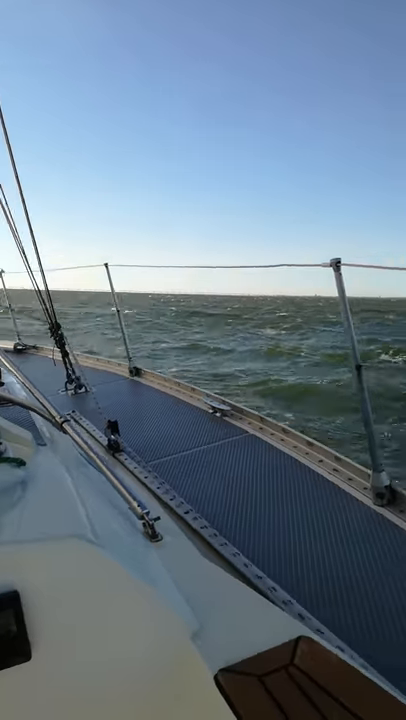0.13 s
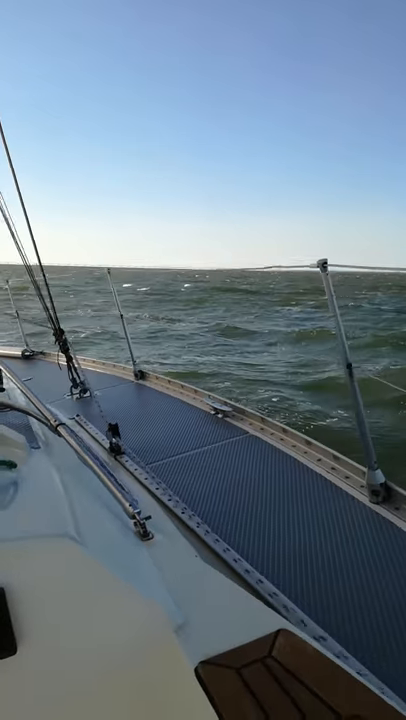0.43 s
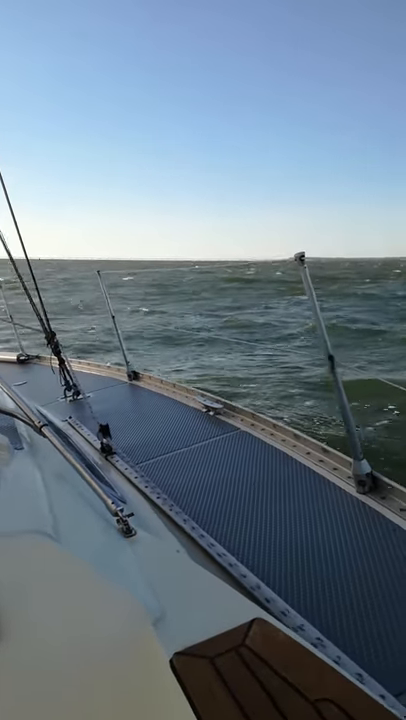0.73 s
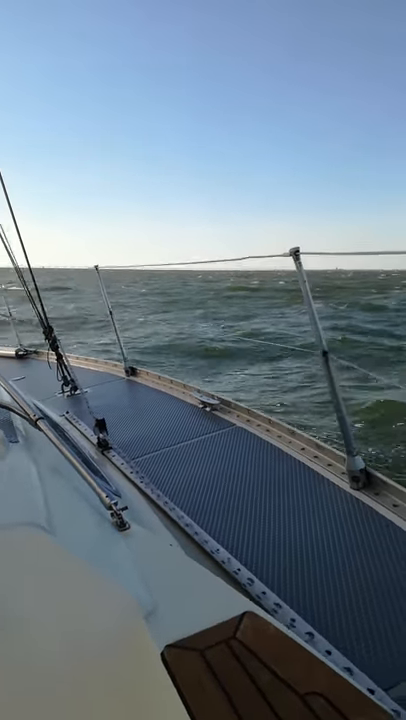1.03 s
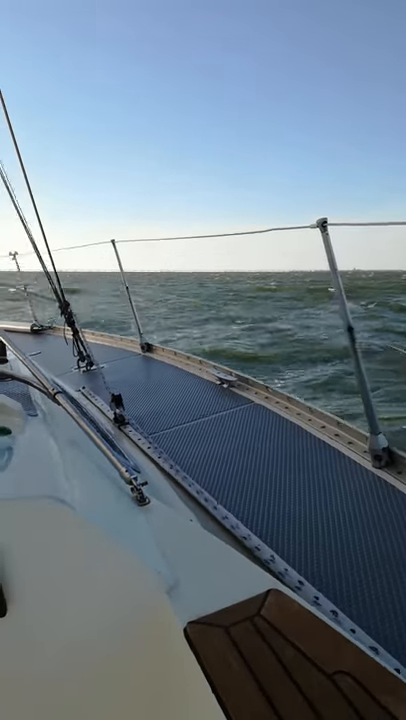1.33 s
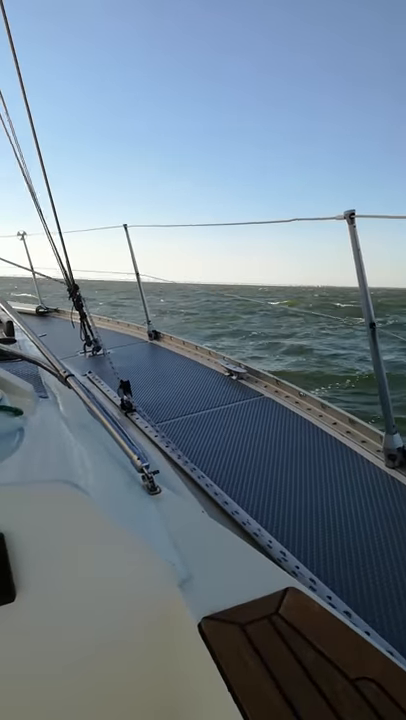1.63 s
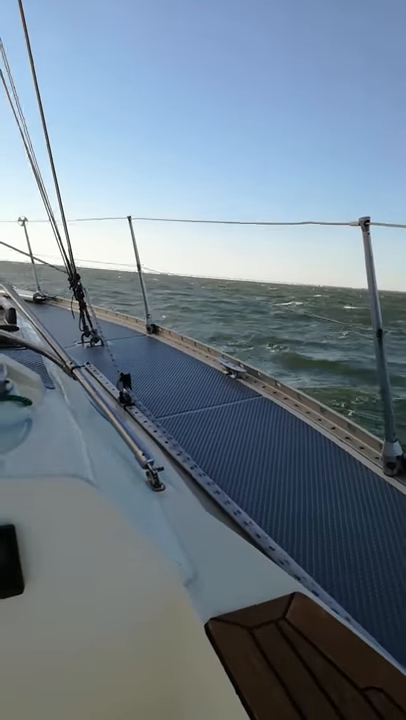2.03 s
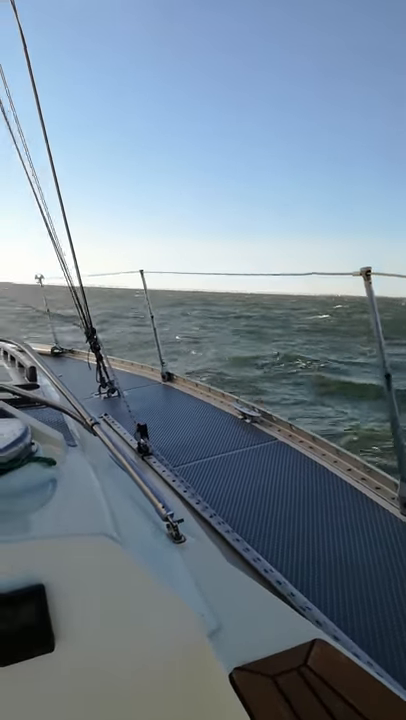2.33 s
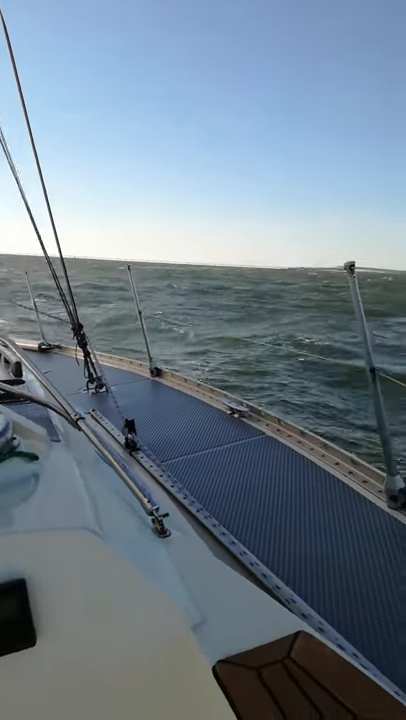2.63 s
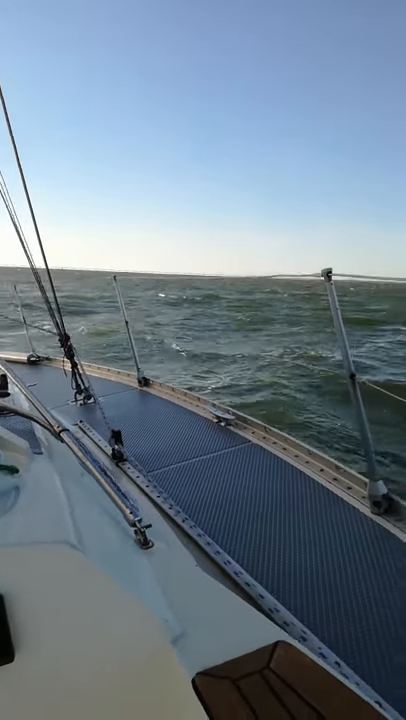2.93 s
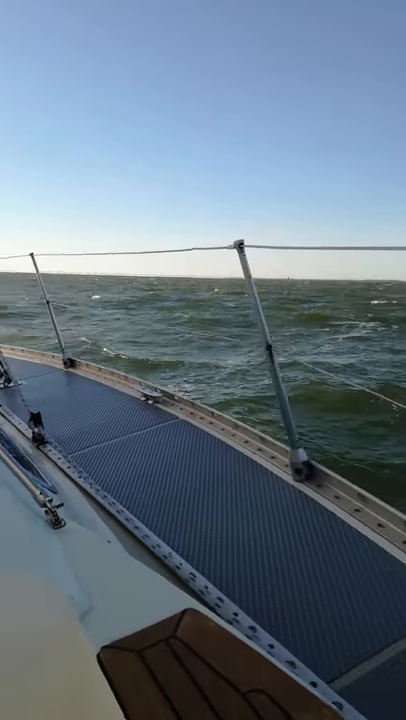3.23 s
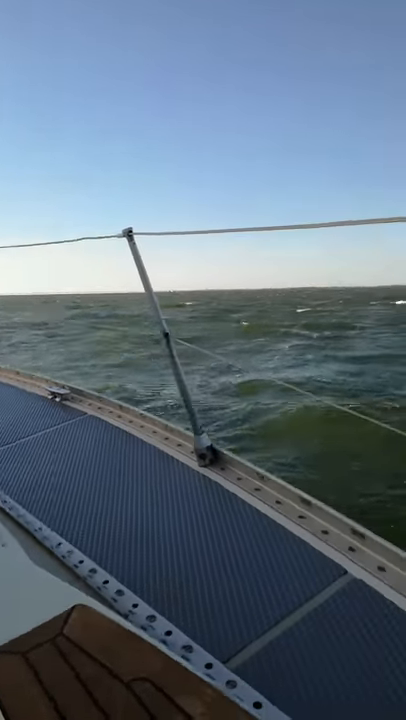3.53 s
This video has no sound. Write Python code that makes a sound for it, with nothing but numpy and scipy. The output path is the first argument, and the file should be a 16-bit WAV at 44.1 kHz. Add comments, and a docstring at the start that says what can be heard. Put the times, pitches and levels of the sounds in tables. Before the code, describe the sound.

Gusty wind rumbles and thumps on a microphone aboard a sailing boat, water rushing faintly along hull

```python
"""Gusty wind rumbles, flutters and thumps on two microphone ports, on the deck of a boat in a choppy sea.
The wind is shaped noise broken into lumps by eddies, with short pressure pulses and sliding low booms.
Water rushes along the hull as noise with ringing drops; a wave breaks into spray near the end.
Wavelets splash as swells of hiss, and fittings in the rigging tick and knock as cracks with decaying tones."""
import sys
import numpy as np
from scipy import signal
from scipy.fft import rfft, irfft, next_fast_len
from scipy.io import wavfile
from scipy.ndimage import uniform_filter1d

SR = 44100
rng = np.random.default_rng(int(sys.argv[2]) if len(sys.argv) > 2 else 0)


def bounce(signal):
    """Save signal as a 16-bit WAV file at the path given by the first command-line argument."""
    frames = np.transpose(np.atleast_2d(signal))
    limited = np.clip(frames, -1, 1)
    pcm = np.round(limited * 32767).astype(np.int16)
    wavfile.write(sys.argv[1], SR, pcm)


N = 162288
TIME = np.arange(N) / SR  # seconds

# Levels are in dB before any layer trim. Side means left minus right in dB, before any scaling or port leak.
# Spectra give the shape of a noise; its loudness is set elsewhere.

# Wind strength. Each row: time in seconds, rumble level in dB, flutter level in dB.
WIND_LEVELS = [(0.0, -38, -48), (0.06, -35, -52), (0.09, -33.5, -52), (0.14, -30, -38.5), (0.25, -31, -46),
               (0.32, -26.5, -40.5), (0.37, -33, -51.5), (0.41, -25, -37.5), (0.44, -26, -34.5),
               (0.49, -33, -42), (0.55, -22.5, -35), (0.62, -35, -55), (0.65, -29.5, -44.5),
               (0.74, -25, -38), (0.87, -27.5, -40), (1.2, -27, -39.5), (1.33, -26, -31),
               (1.35, -26.5, -43), (1.47, -24, -34.5), (1.49, -34.5, -39.5), (1.63, -27.5, -37),
               (1.81, -30, -45), (1.9, -24.5, -34), (1.98, -31.5, -50), (2.09, -25.5, -38),
               (2.19, -26, -37), (2.26, -34, -42.5), (2.35, -20, -37.5), (2.37, -24.5, -31),
               (2.47, -26.5, -42), (2.52, -16.5, -25.5), (2.54, -29, -32), (2.63, -28.5, -45.5),
               (2.65, -25.5, -41), (2.8, -27, -36.5), (2.86, -28.5, -43), (2.89, -25, -37),
               (3.07, -26, -33), (3.11, -35.5, -45), (3.14, -23, -33.5), (3.32, -25.5, -34),
               (3.36, -22.5, -36.5), (3.53, -26.5, -36.5), (3.55, -24.5, -46.5), (3.61, -30, -36.5),
               (3.66, -23, -38)]
# Which port the rumble and flutter favour. Each row: time in seconds, side in dB.
WIND_SIDES = [(0.0, 5), (0.06, -2), (0.25, 7), (0.28, -7), (0.61, -2), (0.76, -4), (0.88, 23), (1.57, -5.5),
              (1.6, 23), (1.69, -9), (1.83, 4), (2.42, 0), (2.53, -21), (2.56, 9), (2.91, -3), (2.97, 2.5),
              (3.66, 2)]
# Slow surges of pressure. Each row: time in seconds, level of the deep sway in dB.
SURGE_LEVELS = [(0.0, -40.5), (0.57, -28.5), (0.61, -35.5), (0.75, -25), (0.79, -33.5), (1.29, -27.5),
                (1.32, -40), (1.45, -21), (1.47, -28), (2.34, -29.5), (2.41, -26), (2.45, -36),
                (2.51, -19.5), (2.61, -30), (2.91, -29), (3.05, -24.5), (3.2, -36), (3.24, -22),
                (3.47, -36.5), (3.53, -23), (3.57, -47), (3.66, -31.5)]
# Gusts tearing past the edge of the ports. Each row: time in seconds, whoosh level in dB, side in dB.
WHOOSH_LEVELS = [(0.0, -58, 10), (0.1, -56, -7), (0.35, -52, 3), (0.39, -60, 2), (0.43, -44.5, 0.5),
                 (0.68, -55, 1), (0.77, -47.5, -10), (0.88, -46.5, 6), (1.11, -50.5, -4.5),
                 (1.23, -42.5, -8), (1.295, -37, -6), (1.35, -46, 2), (1.54, -47.5, -22), (1.61, -48, -3),
                 (1.75, -40, -10), (1.83, -56, 1), (1.91, -48.5, 6), (2.0, -47, -5), (2.04, -41.5, -5),
                 (2.085, -34, -10), (2.13, -45, 0), (2.18, -39, -5), (2.24, -45.5, -8), (2.41, -45.5, -6),
                 (2.485, -39, -4), (2.52, -34.5, -13), (2.55, -41, 7), (2.59, -53, 4.5), (2.84, -44, -20),
                 (2.97, -47, 10), (3.24, -44.5, 2.5), (3.35, -45.5, -2), (3.66, -48.5, 7)]
# Spectra of the large slow eddies, the rumble, the flutter, the whoosh, and the hiss of the hardest gusts
# at the port edges. Each row: frequency in Hz, relative strength in dB per Hz.
SWAY_SPECTRUM = [(15, -7), (30, -8.5), (48, -4), (70, -0.5), (110, 2), (150, -3), (400, -47.5)]
RUMBLE_SPECTRUM = [(25, -33), (60, -19), (120, -3.5), (175, -1), (300, -3), (450, -9), (700, -16.5),
                   (1200, -36.5), (2500, -79.5)]
FLUTTER_SPECTRUM = [(200, -15.5), (450, -2.5), (700, -5), (1000, -10), (1500, -22.5), (2300, -28),
                    (4000, -42), (7000, -64)]
WHOOSH_SPECTRUM = [(500, -16), (900, 4), (1300, 1.5), (1700, -3), (2300, -14.5), (4000, -30), (5500, -32),
                   (9000, -63.5)]
EDGE_SPECTRUM = [(1800, 2.5), (4000, -3), (6500, -29)]
SWAY_DB, RUMBLE_DB, FLUTTER_DB, WHOOSH_DB = -0.5, 3, 7, 5.5  # layer trims
EDGE_DB, EDGE_GROWTH = 7.5, 1.58  # growth: dB of hiss per dB of whoosh

# Water along the hull. Each row: time in seconds, rush level in dB, spray level in dB.
WATER_LEVELS = [(0.0, -64.5, -78), (0.13, -64.5, -79), (0.46, -63, -75.5), (0.57, -58.5, -74),
                (0.82, -59.5, -71.5), (1.31, -56.5, -72.5), (1.83, -61.5, -75.5), (2.1, -63.5, -75),
                (2.3, -59.5, -77), (2.64, -61.5, -74), (2.78, -57, -68), (2.89, -50.5, -63),
                (3.01, -53.5, -65), (3.11, -54.5, -67.5), (3.21, -55, -65), (3.34, -58, -71.5),
                (3.52, -58.5, -71), (3.66, -59, -75)]
# Spectra of the rush and the spray. Each row: frequency in Hz, relative strength in dB per Hz.
RUSH_SPECTRUM = [(400, -1.5), (1200, 4.5), (2300, -4), (3500, 2.5), (4400, -3), (5300, -2.5), (7000, -11.5),
                 (9000, -23), (15000, -35.5)]
SPRAY_SPECTRUM = [(3000, -10), (6000, 3), (8500, 0.5), (11500, -3.5), (15500, -5)]
RUSH_DB, RUSH_SIDE_DB, SPRAY_DB, SPRAY_SIDE_DB = 3.5, -3.5, 5.5, 6
DROPS_PER_S, DROP_SPREAD_DB = 1300, 5  # per channel
DROP_CYCLES, DROPS_DB = 4.5, -9.5  # cycles to fall 60 dB; level beside the rush

# Single eddies that slap a port. Each row: time in seconds, level in dB before the low cut,
# width in seconds, side in dB.
BUFFET_HITS = [(0.066, -15, 0.00047, -15), (0.2812, -12.5, 0.00078, 0), (0.7443, -12, 0.00065, -18),
               (.765, -12, 0.00044, -23), (1.0015, -12, 0.00046, 15), (1.446, -11, 0.00033, 21),
               (2.9003, -10.5, 0.00041, -20), (2.928, -13, 0.00037, 9), (3.054, -12.5, 0.0015, 20),
               (3.1425, -10.5, 0.00067, -9), (3.174, -14, 0.00031, 11), (3.225, -13, 0.0004, -7),
               (3.261, -6, 0.00053, -8), (3.5267, -5, 0.00098, -1)]
WAKE_FADE_S, WAKE_DB, WAKE_TOP_HZ, BUFFET_LOW_HZ = 0.0064, -1, 846, 80

# Wavelets against the hull. Each row: time of the peak in seconds, length (spread) in seconds, level in dB.
SPLASH_SWELLS = [(0.183, 0.024, -57.5), (0.77, 0.076, -53), (1.205, 0.038, -53.5)]
# Spectrum of a splash. Each row: frequency in Hz, relative strength in dB per Hz.
SPLASH_SPECTRUM = [(1500, -6), (2600, 4), (3500, 5), (5500, 1), (7500, -7.5), (10000, -18), (15000, -18)]

# Vortices rolling past the ports. Each row: time of the peak in seconds, half length (spread) in seconds,
# pitch at the peak in Hz before wobble, glide in octaves per second, level in dB.
VORTEX_BOOMS = [(0.43, .028, 150, -4, -22), (1.056, .04, 110, -3, -26), (1.682, .025, 122, 2, -24.5),
                (2.194, .03, 155, -3, -22), (2.406, .025, 128, 7, -25.5), (3.158, 0.027, 172, 4, -27),
                (3.251, 0.023, 135, 2.5, -26.5), (3.632, .05, 186, 1.5, -25.5)]
VORTEX_DB, VORTEX_ROUGH_DB = 0.5, 0.5  # trim; spread of the wavering level
VORTEX_WOBBLE_OCTAVES, VORTEX_WOBBLE_HZ = 0.1309, 63

# A shackle ticks, and a block on the sheet knocks and bounces.
# Each row: time in seconds, level in dB, side in dB.
SHACKLE_TICKS = [(1.379, -35.5, 2), (2.2765, -39, 5), (2.3255, -38, 1.5), (2.375, -34, 1), (3.402, -49, 3)]
BLOCK_KNOCKS = [(1.7503, -35.5, 1), (1.758, -43.5, -2)]
# Tones of the two fittings. Each row: pitch in Hz, relative level in dB, time to fall 60 dB in seconds.
SHACKLE_TONES = [(3100, -6.5, .035), (4050, 1.5, 0.033), (5400, -14.5, .03), (6240, -11, 0.035),
                 (7300, -17, .025), (9070, -21, .03)]
BLOCK_TONES = [(1860, 4, .04), (2910, 9, 0.055), (3450, 4, .03), (3980, -4, .055), (4200, 5, 0.04),
               (4930, 2, 0.038), (7400, -13, 0.035), (9200, -13, .03), (10700, -12, .025)]
# Spectrum of the crack of contact. Each row: frequency in Hz, relative strength in dB per Hz.
CRACK_SPECTRUM = [(1200, 1), (2800, 6.5), (5000, 1.5), (7000, -7), (11000, -19.5), (13500, -22),
                  (15500, -26)]
CLACK_ATTACK_S, CLACK_T60_S, DECK_DB, DECK_T60_S = 0.0018, 0.048, -9, 0.26

# Each port also reaches the other channel, late and dull.
LEAK_SHARE, LEAK_HZ, LEAK_LAG_S = 0.78, 400, 0.00055
CUTOFF_HZ = 15800


def from_db(db):
    """Turn decibels into gain."""
    return 10 ** (np.asarray(db) / 20)


def rms_one(x):
    """Scale a signal to an rms strength of 1."""
    return x / np.sqrt(np.mean(x ** 2) + 1e-20)


def in_time(rows):
    """Join the points of each column with straight lines, one value per sample."""
    s, *columns = np.transpose(rows)
    return [np.interp(TIME, s, column) for column in columns]


def panned(side_db):
    """Left and right gains that differ by side_db but keep the total power."""
    gains = from_db(np.array([[.5], [-.5]]) * side_db)
    return gains / np.sqrt(np.mean(gains ** 2, axis=0))


def drift(rate_hz):
    """Random wandering of spread 1: noise smoothed by two equal low-pass stages at rate_hz."""
    step = 20  # samples between computed points
    r = np.exp(-2 * np.pi * rate_hz * step / SR)
    raw = rng.standard_normal(N // step + 4002)
    slow = signal.lfilter([1], [1, -2 * r, r * r], raw)[4000:]  # skip the start-up
    return np.interp(np.arange(N) / step, np.arange(len(slow)), rms_one(slow))


def coloured(x, spectrum):
    """Give a signal a spectrum that falls away beyond its ends; rms 1."""
    hz, db = np.transpose(spectrum)
    size = next_fast_len(N + SR // 2)
    f = np.arange(size // 2 + 1) * SR / size + .5
    gain = from_db(np.interp(np.log(f), np.log(hz), db))
    gain = gain * np.minimum(f / hz[0], 1) ** 2 * np.minimum(hz[-1] / f, 1) ** 2
    return rms_one(irfft(rfft(x, size) * gain, size)[..., :N])


def noise(spectrum):
    """Shaped noise, unrelated between left and right."""
    return coloured(rng.standard_normal((2, N)), spectrum)


def ring(drive, hz, t60):
    """A resonance that rings at one pitch when struck and falls 60 dB in t60 seconds."""
    r, w = from_db(-60 / (t60 * SR)), 2 * np.pi * hz / SR
    return signal.lfilter([0, np.sin(w)], [1, -2 * r * np.cos(w), r * r], drive + 1e-18)


def turbulence(spectrum, eddies, shared_db, own_db, own_rate, even_s):
    """Noise of even strength broken into lumps by shared eddies and by each port's own."""
    air = noise(spectrum)
    strength = uniform_filter1d(np.mean(air ** 2, axis=0), int(even_s * SR) + 1)
    air = air / np.sqrt(strength + 1e-9)
    own_eddies = np.array([drift(own_rate), drift(own_rate)])
    return rms_one(air * from_db(shared_db * eddies + own_db * own_eddies))


def wind():
    """Deep sway, rumble, flutter and the bright whoosh of gusts, shaken by the same eddies."""
    rumble_db, flutter_db = in_time(WIND_LEVELS)
    sway_db, = in_time(SURGE_LEVELS)
    side_db, = in_time(WIND_SIDES)
    whoosh_db, whoosh_side_db = in_time(WHOOSH_LEVELS)
    eddies = drift(49)
    eddies = rms_one(eddies - uniform_filter1d(eddies, size=SR // 12))  # keep only the quick changes
    # A negative shared_db makes a layer dip where the eddies rise.
    sway = turbulence(SWAY_SPECTRUM, eddies, shared_db=-0.6, own_db=0.3, own_rate=20, even_s=0.05)
    rumble = turbulence(RUMBLE_SPECTRUM, eddies, shared_db=1.5, own_db=0.7, own_rate=78, even_s=0.035)
    flutter = turbulence(FLUTTER_SPECTRUM, eddies, shared_db=2.0, own_db=1.5, own_rate=35, even_s=0.019)
    whoosh = turbulence(WHOOSH_SPECTRUM, eddies, shared_db=-0.13, own_db=3.0, own_rate=22, even_s=0.042)
    edge = from_db(EDGE_DB + EDGE_GROWTH * whoosh_db + 2 * eddies) * noise(EDGE_SPECTRUM)
    whoosh = from_db(WHOOSH_DB + whoosh_db) * whoosh + edge
    return (from_db(SWAY_DB + sway_db) * sway
            + from_db(RUMBLE_DB + rumble_db) * rumble * panned(0.21 * side_db)
            + from_db(FLUTTER_DB + flutter_db) * flutter * panned(1.06 * side_db)
            + whoosh * panned(2.2 * whoosh_side_db))


def water():
    """Foam rushes by the hull, spray hisses above it, and drops and small bubbles tick in it."""
    rush_db, spray_db = in_time(WATER_LEVELS)
    rush = from_db(RUSH_DB + drift(23)) * noise(RUSH_SPECTRUM)
    sizes = from_db(DROP_SPREAD_DB * np.minimum(rng.exponential(1, (2, N)), 5))
    signs = rng.choice([-1, 1], (2, N))
    clicks = sizes * signs * (rng.random((2, N)) < DROPS_PER_S / SR)
    # Each moment is dealt one of 16 pitches, and its clicks ring there.
    pitches = np.geomspace(1800, 7000, 16)
    dealt = rng.integers(0, len(pitches), N)
    drops = rms_one(sum(ring(clicks * (dealt == k), hz, DROP_CYCLES / hz) for k, hz in enumerate(pitches)))
    spray = coloured(rng.standard_normal((2, N)) * from_db(1.7 * drift(400)), SPRAY_SPECTRUM)
    return (from_db(rush_db) * panned(RUSH_SIDE_DB) * (rush + from_db(DROPS_DB) * drops)
            + from_db(spray_db + SPRAY_DB) * panned(SPRAY_SIDE_DB) * spray)


def buffets():
    """A push of pressure between two shallow sucks, trailing a short ragged wake."""
    out = np.zeros((2, N))
    low_pass = signal.butter(3, WAKE_TOP_HZ, fs=SR, output="sos")
    ragged = signal.sosfilt(low_pass, rng.standard_normal((2, N)))
    for s, db, width, side_db in BUFFET_HITS:
        age = (TIME - s) / width
        push = (1 - .5 * age ** 2) * np.exp(-.5 * age ** 2)
        fade = np.clip(age + 1, 0, 1) * np.exp(-np.abs(TIME - s) / WAKE_FADE_S)
        wake = from_db(WAKE_DB) * ragged * fade
        out += from_db(db) * panned(side_db) * (push + wake)
    return signal.sosfilt(signal.butter(1, BUFFET_LOW_HZ, "high", fs=SR, output="sos"), out)


def splashes():
    """Each wavelet is a rounded swell of hiss."""
    swells = sum(from_db(db) * np.exp(-.5 * ((TIME - s) / length) ** 2) for s, length, db in SPLASH_SWELLS)
    return swells * noise(SPLASH_SPECTRUM) * panned(-5.5)


def vortices():
    """Each vortex is a rounded, wavering boom whose pitch slides as it passes both ports."""
    out = np.zeros(N)
    wobble = VORTEX_WOBBLE_OCTAVES * drift(VORTEX_WOBBLE_HZ)
    rough_db = VORTEX_ROUGH_DB * drift(VORTEX_WOBBLE_HZ)
    for s, length, hz, glide, db in VORTEX_BOOMS:
        age = np.clip(TIME - s, -5 * length, 5 * length)  # stops the glide running away
        turns = np.cumsum(hz * 2 ** (glide * age + wobble)) / SR + rng.random()
        swell = from_db(VORTEX_DB + db + rough_db) * np.exp(-.5 * (age / length) ** 2)
        out += swell * np.sin(2 * np.pi * turns)
    return out


def rigging(hits, modes, crack_db, ring_db, scatter):
    """Each hit is a short crack, with a faint tail off the deck, and the struck ring of the fitting."""
    out, crack = np.zeros((2, N)), noise(CRACK_SPECTRUM)
    for s, db, side_db in hits:
        age = np.maximum(TIME - s, 0)
        deck_tail = from_db(DECK_DB - 60 * age / DECK_T60_S)
        dying = from_db(-60 * age / CLACK_T60_S) + deck_tail
        clack = from_db(crack_db) * crack * np.minimum(age / CLACK_ATTACK_S, 1) * dying
        # The ring is driven by one sharp click and a little fading noise.
        contact = rng.standard_normal((2, N)) * (age > 0) * np.exp(-age / 0.004) * scatter
        contact[:, int(s * SR)] += 1
        tone = sum(from_db(level_db) * rms_one(ring(contact, hz, t60)) for hz, level_db, t60 in modes)
        tone = from_db(ring_db) * tone / np.abs(tone).max()
        out += from_db(db) * panned(side_db) * (clack + tone)
    return out


def ports(air):
    """Each channel hears its own port and a late, dull share of the other."""
    dull = signal.sosfilt(signal.butter(1, LEAK_HZ, fs=SR, output="sos"), air[::-1])
    late = np.array([np.interp(TIME - LEAK_LAG_S, TIME, side) for side in dull])
    return (air + LEAK_SHARE * late) / np.sqrt(1 + LEAK_SHARE ** 2)


def scene():
    """Wind on the microphone ports over the water and the rigging."""
    air = wind() + buffets() + vortices()
    ticks = rigging(SHACKLE_TICKS, SHACKLE_TONES, crack_db=-7, ring_db=0.5, scatter=.03)
    knocks = rigging(BLOCK_KNOCKS, BLOCK_TONES, crack_db=-7.5, ring_db=4.0, scatter=.15)
    return ports(air) + water() + splashes() + ticks + knocks


def record(dry):
    """Cut the top steeply with a low-pass filter."""
    return signal.sosfilt(signal.ellip(10, .1, 80, CUTOFF_HZ, fs=SR, output="sos"), dry)


dry = scene()
out = record(dry)
bounce(out)
```